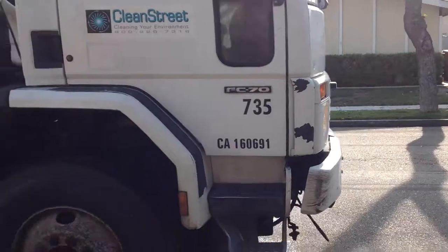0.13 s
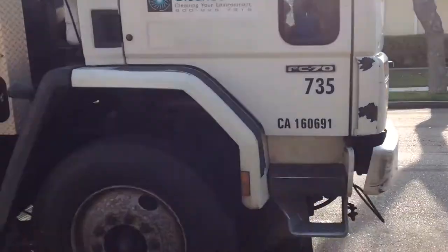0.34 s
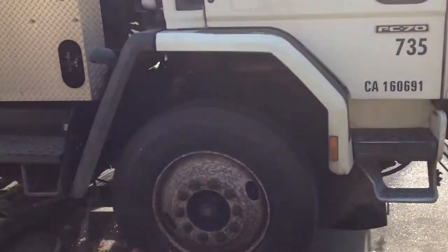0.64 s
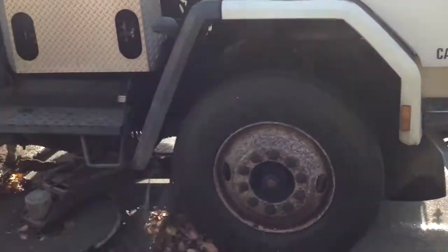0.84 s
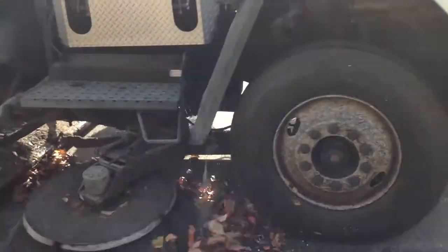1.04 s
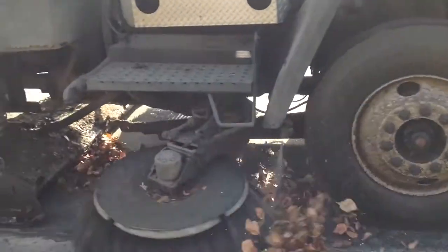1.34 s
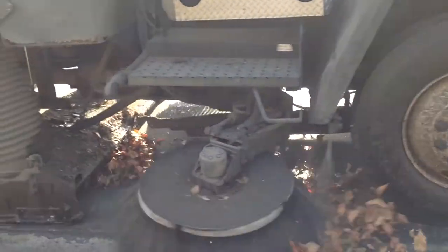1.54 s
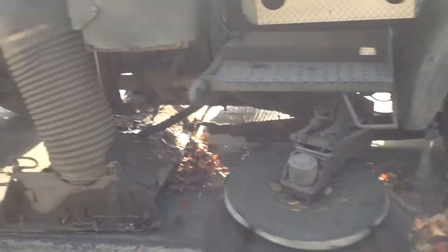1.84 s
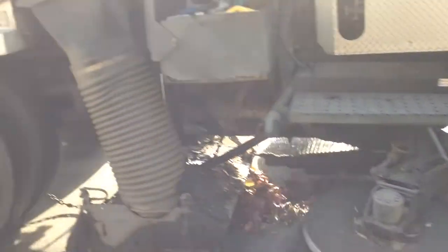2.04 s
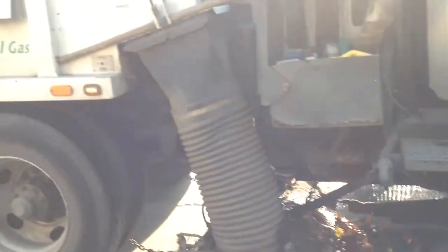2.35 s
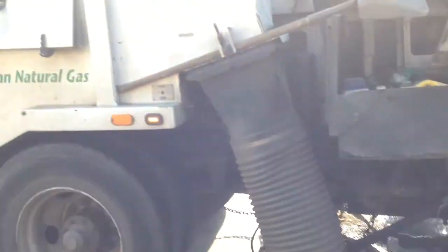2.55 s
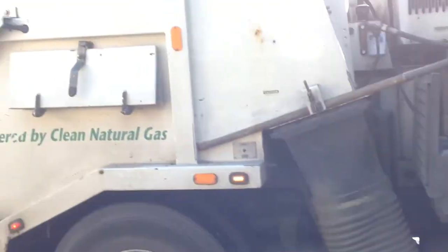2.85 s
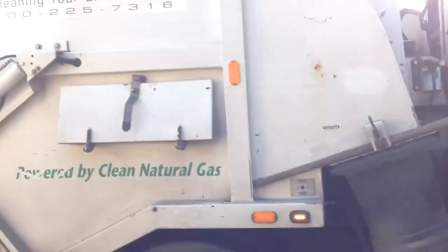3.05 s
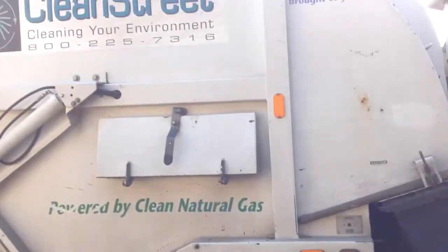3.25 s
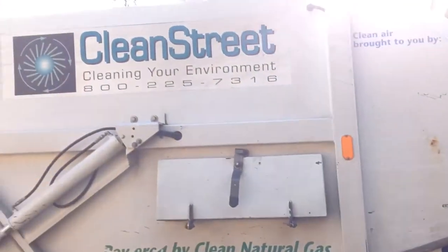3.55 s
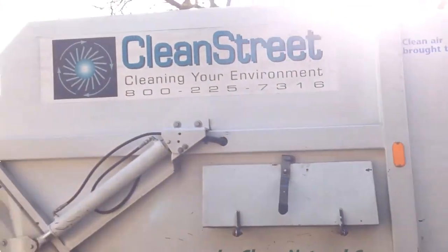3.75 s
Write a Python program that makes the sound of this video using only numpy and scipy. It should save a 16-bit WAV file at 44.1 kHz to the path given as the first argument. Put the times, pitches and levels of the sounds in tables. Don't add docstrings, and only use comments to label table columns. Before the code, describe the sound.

A street sweeper truck crawls past at the roadside, its engine booming and suction fan droning under a broad roar of air; hisses shift from front sprays to rear jets, close on an overloaded phone microphone.

```python
import sys
import numpy as np
from scipy import signal
from scipy.io import wavfile
from scipy.ndimage import uniform_filter1d

SR = 44100
rng = np.random.default_rng(int(sys.argv[2]) if len(sys.argv) > 2 else 0)


def log_audio(samples):
    frames = np.atleast_2d(samples).T
    limited = np.clip(frames, -1, 1)
    pcm = np.round(limited * 32767).astype(np.int16)
    wavfile.write(sys.argv[1], SR, pcm)


def to_linear_factor(level_db):
    exponent = np.asarray(level_db, float) / 20
    return 10 ** exponent


N = 172431


def rms_one(x):
    return x / np.sqrt(np.mean(x ** 2) + 1e-20)


def clock():
    return np.arange(N) / SR


def drift(rate_hz):
    r = np.exp(-80 * np.pi * rate_hz / SR)
    slow = signal.lfilter([1], [1, -2 * r, r * r], rng.standard_normal(N // 40 + 2002))
    slow = rms_one(slow[2000:])
    return np.interp(np.arange(N) / 40, np.arange(len(slow)), slow)


def passing(closest_s, reach_s):
    return 1 / (1 + ((clock() - closest_s) / reach_s) ** 2)


def tone(hz):
    cycles = np.cumsum(hz + np.zeros(N)) / SR
    return np.sqrt(2) * np.sin(2 * np.pi * (cycles + rng.random()))


# time_s, pitch_hz, level_db
ENGINE_BOOM = [
    (.12, 172.7, -17.5),
    (.7, 171.9, -20),
    (1.1, 173.3, -16.5),
    (1.5, 173.6, -15.5),
    (1.9, 174, -13),
    (2.3, 172.9, -12),
    (2.7, 171.9, -11),
    (3.1, 171.4, -13),
    (3.5, 171.7, -15),
    (3.91, 170, -13.5),
]
# multiple of the firing beat, level_db relative to the boom
ENGINE_ORDERS = [(2, -34.5), (3, 0.), (4, -14.5), (6, -40), (8, -29.5), (10, -32.5), (12, -25.5)]


def engine():
    time_s, pitch_hz, boom_db = np.transpose(ENGINE_BOOM)
    beat_hz = np.interp(clock(), time_s, pitch_hz) / 3
    level_db = np.interp(clock(), time_s, boom_db)
    out = 0
    for order, order_db in ENGINE_ORDERS:
        wobble_db = 0.9 * drift(12)
        out = out + to_linear_factor(level_db + order_db + wobble_db) * tone(round(order) * beat_hz)
    return out


# multiple of the piston rate, level_db at closest, closest_s, reach_s
PUMP_HARMONICS = [(2, -34, 3.6, 1.7), (3, -29.5, 2.85, 1.43), (4, -26.5, 2.9, 0.63), (5, -30.5, 1.12, 0.31),
                  (6, -42, 1.3, 0.3)]


def pump():
    piston_hz = 221.3 * (1 + 0.0025 * drift(3.04) - 0.002948 * (clock() - 2))
    out = 0
    for multiple, level_db, closest_s, reach_s in PUMP_HARMONICS:
        level = to_linear_factor(level_db + 3.0 * drift(24)) * passing(closest_s, reach_s)
        out = out + level * tone(round(multiple) * piston_hz)
    return out


def fan():
    blade_hz = 266.9 + 0.905 * drift(1.24)
    blade = to_linear_factor(-27.5 + 1.5 * drift(11)) * passing(closest_s=2.2, reach_s=3.4) * tone(blade_hz)
    shaft = to_linear_factor(-51.5 + 4.7 * drift(2.5)) * tone(75.5)
    return blade + shaft


def hiss(closest_s, reach_s, resonances):
    out = 0
    for hz, width_hz, db in resonances:
        r = np.exp(-np.pi * width_hz / SR)
        stage = [1, 0, -1, 1, -2 * r * np.cos(2 * np.pi * hz / SR), r * r]
        ringing = signal.sosfilt([stage, stage], rng.standard_normal(N))
        out = out + to_linear_factor(db) * rms_one(ringing)
    return out * passing(closest_s, reach_s)


NOZZLES = 0.34, 0.58, [(4870, 1100, -19.5), (6100, 1300, -21), (7000, 2300, -22.5), (332, 36, -24),
           (1032, 85, -41), (795, 47, -37)]


def spray_nozzles():
    return hiss(*NOZZLES)


WHEEL_ARCH = 0.66, 0.57, [(10400, 2800, -22.5), (7000, 2700, -18), (1020, 27, -35), (13000, 3800, -27.),
              (447.5, 48, -31.), (687, 160, -28)]


def wheel_arch():
    return hiss(*WHEEL_ARCH)


BROOM = 1.47, 0.43, [(8824, 510, -23.), (5000, 1240, -21.5), (7000, 1100, -22.5), (2100, 240, -30),
         (210.6, 6.7, -24.5)]


def gutter_broom():
    return hiss(*BROOM)


HEAD = 2.007, 0.46, [(4830, 1400, -19), (8800, 600, -43), (1068, 70, -32.), (466.3, 54, -26),
        (785, 50, -30.5)]


def suction_head():
    return hiss(*HEAD)


HOSE = 2.66, 0.51, [(827, 71, -28), (892, 31, -34.5), (14600, 820, -27.), (10660, 470, -29.5),
        (8500, 800, -25), (459, 85, -28.5)]


def suction_hose():
    return hiss(*HOSE)


HOPPER = 3.3, 0.24, [(4970, 510, -23), (6800, 680, -22.5), (2490, 200, -29), (507, 65, -33.)]


def hopper():
    return hiss(*HOPPER)


REAR_JETS = 3.7, .4, [(5483, 800, -22), (4450, 670, -22.5), (6950, 900, -29), (1660, 320, -28),
             (569, 27, -31.5), (2949, 1100, -25)]


def rear_jets():
    return hiss(*REAR_JETS)


UNDERBODY = 2.1, 1.3, [(60, 55, -45), (109, 130, -34.5)]


def underbody():
    return hiss(*UNDERBODY)


def banded_noise(spectrum, patchy_db, quick_db):
    hz, level_db = np.transpose(spectrum)
    edges = hz[0] / 1.5 * 2 ** np.arange(0, np.log2(hz[-1] / hz[0]) + 1, 1 / 3)
    tops = np.minimum(edges[1:], 0.45 * SR)
    white = rng.standard_normal((2, N))
    together = drift(59)
    out = 0
    for k, (low, high) in enumerate(zip(edges, tops)):
        band_filter = signal.butter(2, [low, high], "band", fs=SR, output="sos")
        band = signal.sosfilt(band_filter, white[k % 2])
        mean_db = np.interp(np.log(low * high) / 2, np.log(hz), level_db)
        moving_db = patchy_db * drift(1.9) + quick_db * (together + drift(7.6))
        out = out + band * to_linear_factor(mean_db + moving_db)
    return rms_one(out)


# pitch_hz, density_db per Hz
RUMBLE = [(30, -25), (100, -32), (150, -11), (200, 3), (290, -3.5), (370, -10.), (480, -4.5), (600, -13.5)]


def rumble():
    noise = banded_noise(RUMBLE, patchy_db=0.4, quick_db=0.5)
    return to_linear_factor(-20.5) * passing(closest_s=3.9, reach_s=6.9) * noise


# pitch_hz, density_db per Hz
ROAR = [(450, -14.5), (900, 0.), (1400, -3.), (3300, -3), (4600, 0), (9000, -0.16), (10500, -4),
        (15500, -5.5)]


def roar():
    return to_linear_factor(-12) * banded_noise(ROAR, patchy_db=1.1, quick_db=0.25)


# delay_s, change_s per second, level_db
ECHOES = [(.0031, -.0009, -21.), (.0057, .0008, -21.), (.0094, -.0012, -23.)]


def echoes(x):
    here = np.arange(N)
    late = 0
    for delay_s, change, db in ECHOES:
        delay = np.round(SR * (delay_s + change * (clock() - 2)))
        late = late + to_linear_factor(db) * np.interp(here - delay, here, x)
    return (x + late) / 1.017


def scene():
    front = spray_nozzles() + wheel_arch() + gutter_broom() + suction_head()
    rear = suction_hose() + hopper() + rear_jets() + underbody()
    noises = echoes(rumble() + roar() + front + rear)
    return np.tile(engine() + pump() + fan() + noises, (2, 1))


def overload(x):
    limit, knee = 0.97, 7
    return x / (1 + np.abs(x / limit) ** knee) ** (1 / knee)


def starve(x):
    hz, _, z = signal.stft(x, SR, nperseg=2048)
    field = uniform_filter1d(rng.standard_normal(z.shape), 5, axis=1)
    field = rms_one(uniform_filter1d(field, 6, axis=0))
    from_hz, full_hz = 8500, 11500
    treble = np.clip((hz - from_hz) / (full_hz - from_hz), 0, 1)[:, None]
    holes = field * treble ** 0.2 > 1.7
    below_cut = (hz < 15300)[:, None]
    return signal.istft(z * ~holes * below_cut, SR, nperseg=2048)[1][:N]


# start_s, low_hz, high_hz, level_db
SPLITS = [
    (.813, 5000, 6400, -19),
    (.836, 6800, 8700, -20),
    (.836, 8800, 10400, -23.),
    (.998, 4550, 5840, -23),
    (1.347, 13700, 15600, -23),
    (3.228, 7600, 9800, -21),
    (3.228, 12400, 14600, -25.),
    (3.274, 6800, 8400, -18),
    (3.831, 5645, 7000, -17),
]


def splits():
    out = np.zeros(N)
    for start_s, low_hz, high_hz, db in SPLITS:
        edges = [low_hz / 1.02, high_hz * 1.02]
        band_filter = signal.cheby2(10, 70, edges, "band", fs=SR, output="sos")
        band = rms_one(signal.sosfilt(band_filter, rng.standard_normal(N)))
        swell = np.sin(np.pi * np.clip((clock() - start_s) / 0.046, 0, 1)) ** 2
        out += to_linear_factor(db) * band * swell
    return out * [[1], [-1]]


def abrupt_start():
    start_s = 0.1205
    return np.interp(clock(), [start_s - 0.0035, start_s, start_s + 0.0003], [0, to_linear_factor(-24.0), 1])


def band_limit(x):
    return signal.sosfilt(signal.butter(12, 16390, fs=SR, output="sos"), x)


def record(dry):
    mono = starve(overload(dry[0])) * abrupt_start()
    return band_limit(mono + splits())


dry = scene()
out = record(dry)
log_audio(out)
```